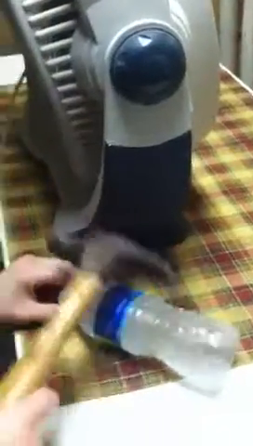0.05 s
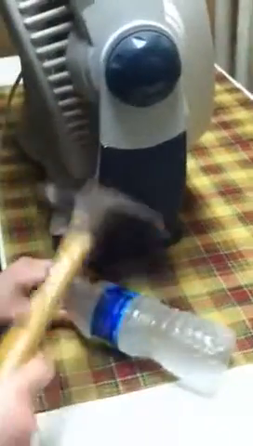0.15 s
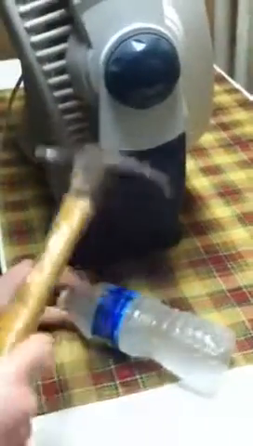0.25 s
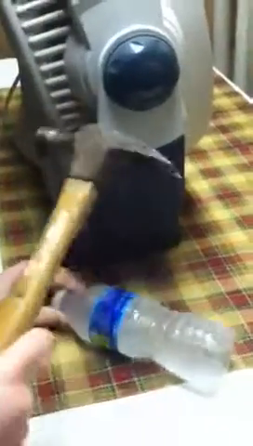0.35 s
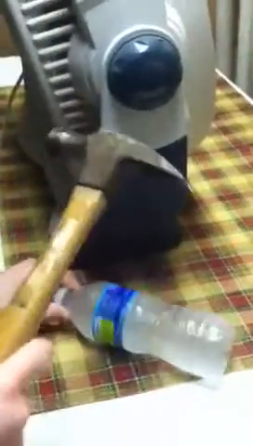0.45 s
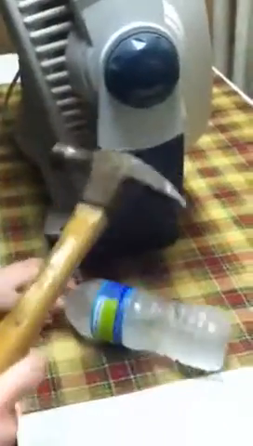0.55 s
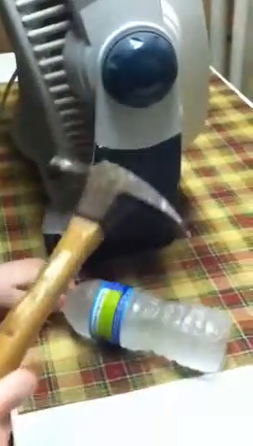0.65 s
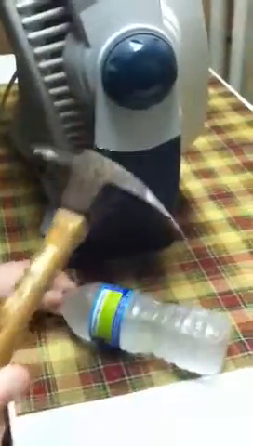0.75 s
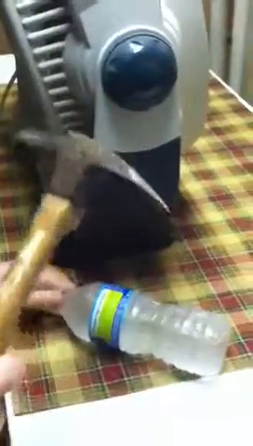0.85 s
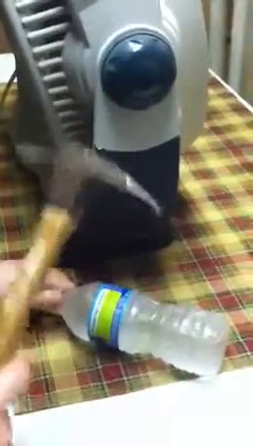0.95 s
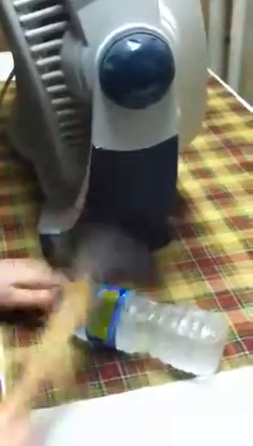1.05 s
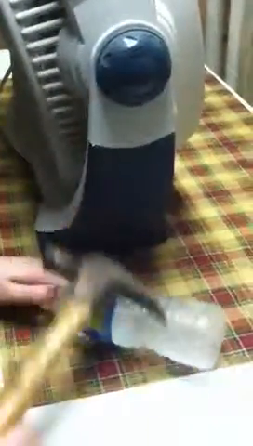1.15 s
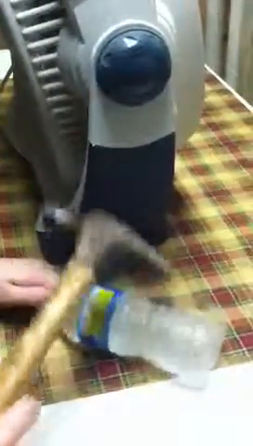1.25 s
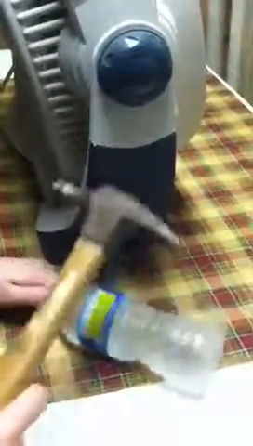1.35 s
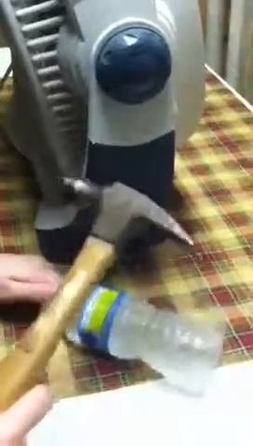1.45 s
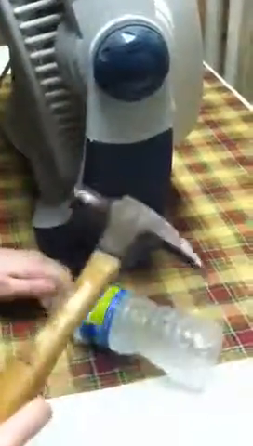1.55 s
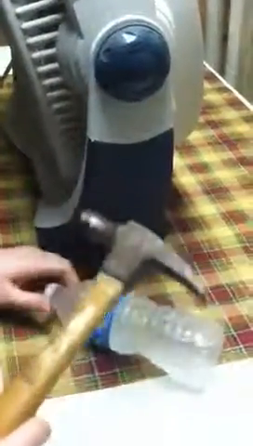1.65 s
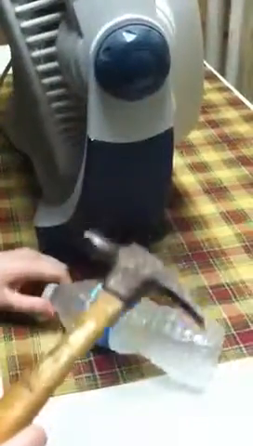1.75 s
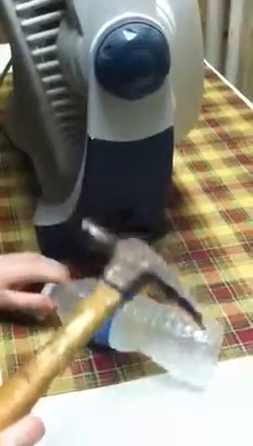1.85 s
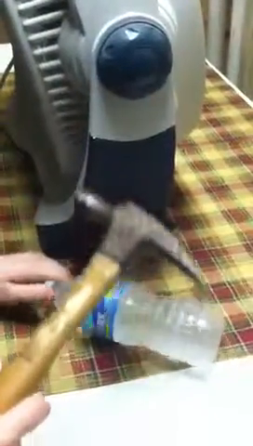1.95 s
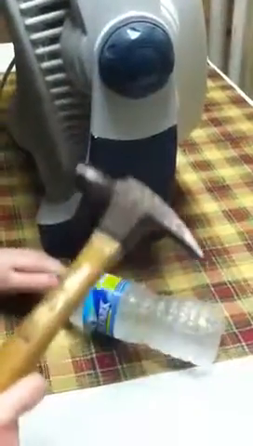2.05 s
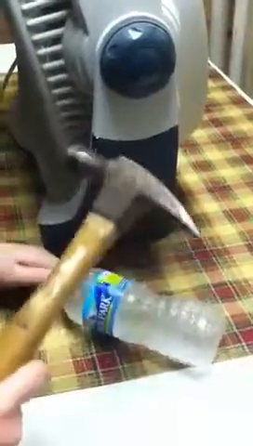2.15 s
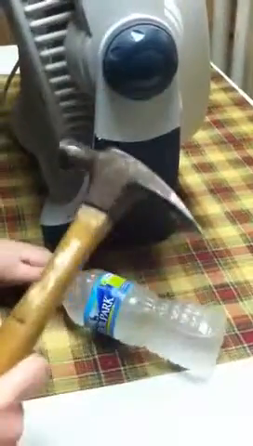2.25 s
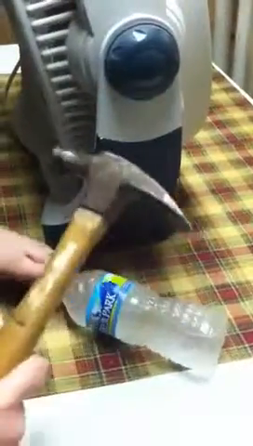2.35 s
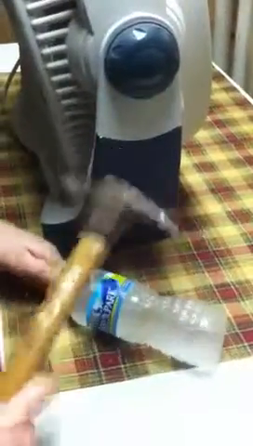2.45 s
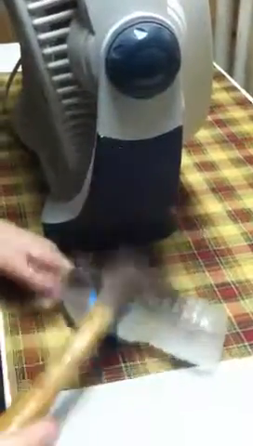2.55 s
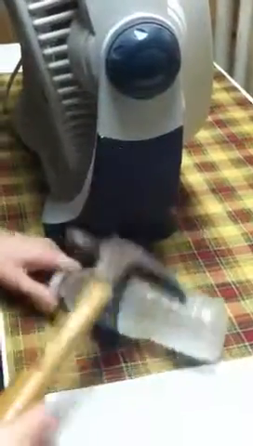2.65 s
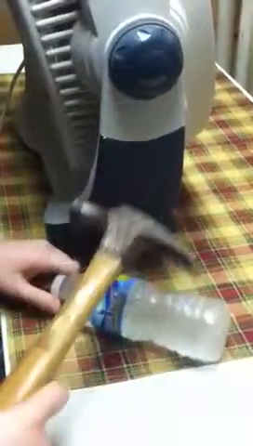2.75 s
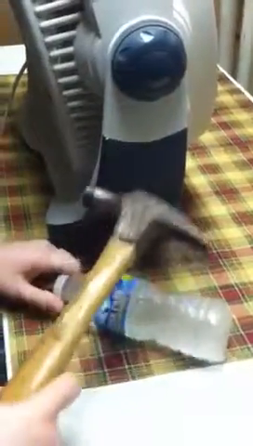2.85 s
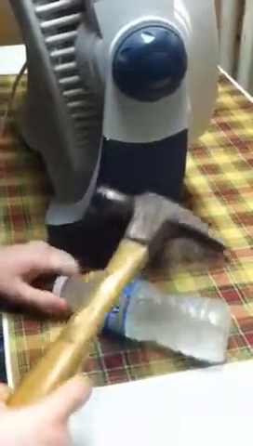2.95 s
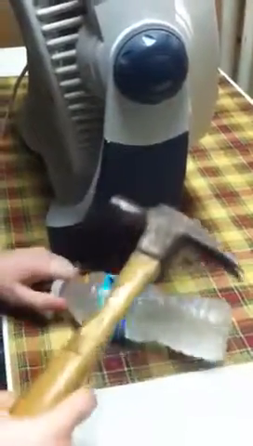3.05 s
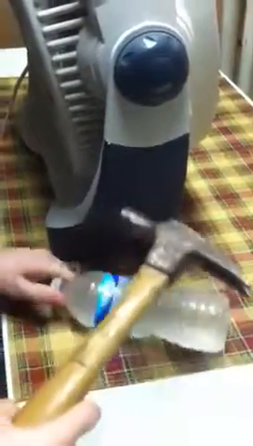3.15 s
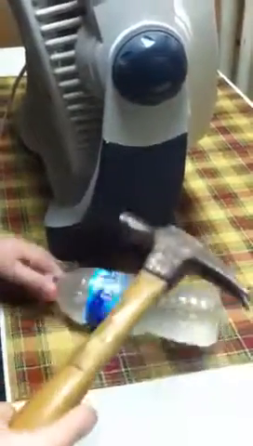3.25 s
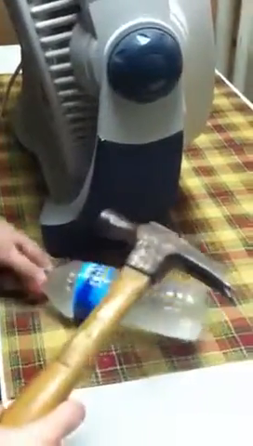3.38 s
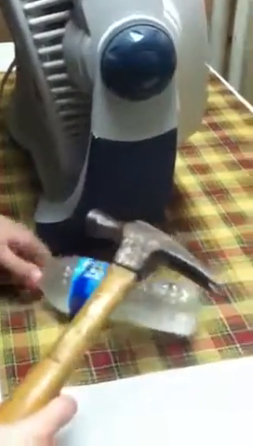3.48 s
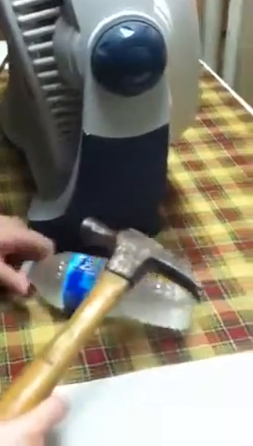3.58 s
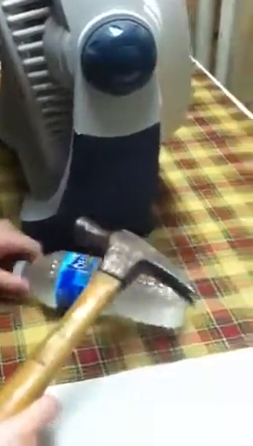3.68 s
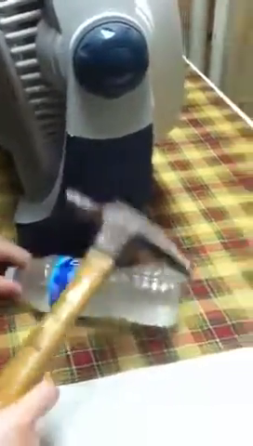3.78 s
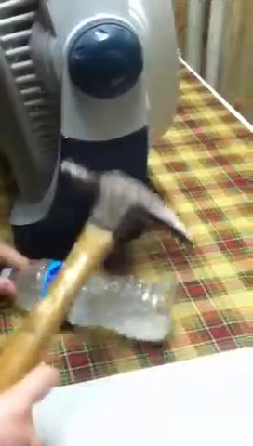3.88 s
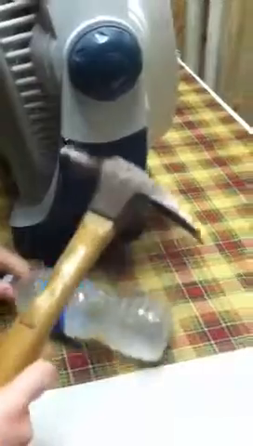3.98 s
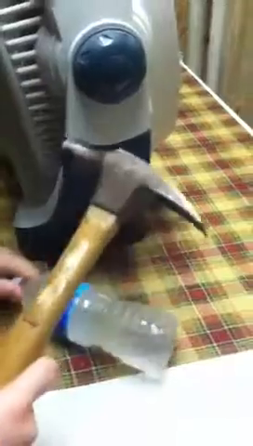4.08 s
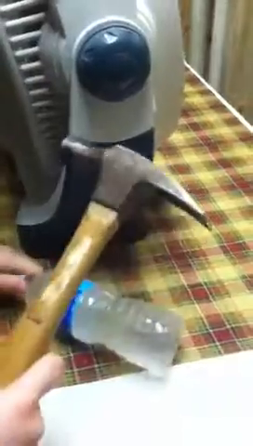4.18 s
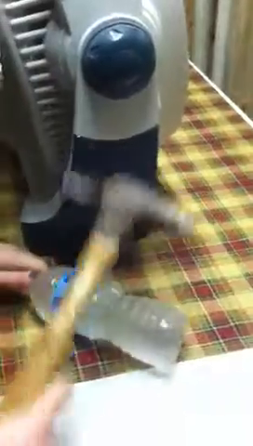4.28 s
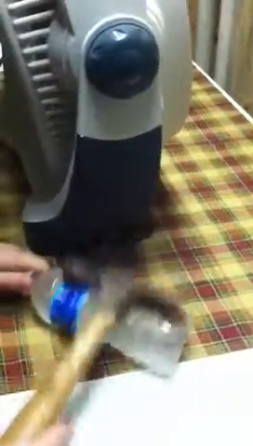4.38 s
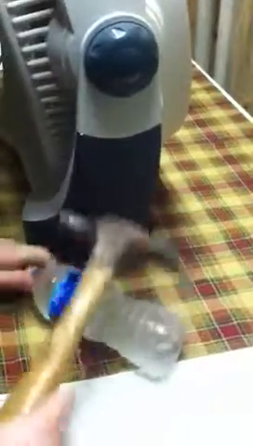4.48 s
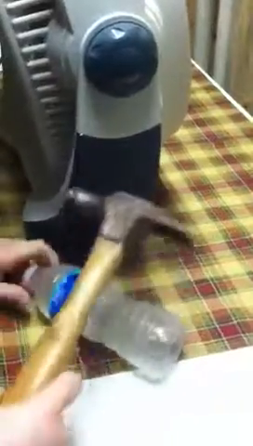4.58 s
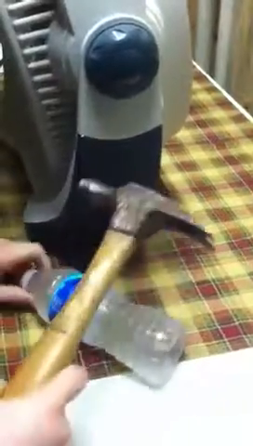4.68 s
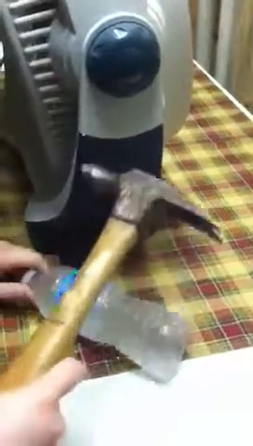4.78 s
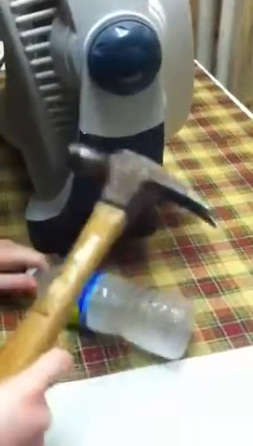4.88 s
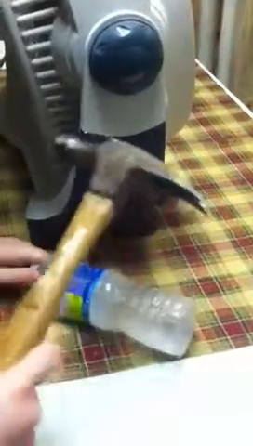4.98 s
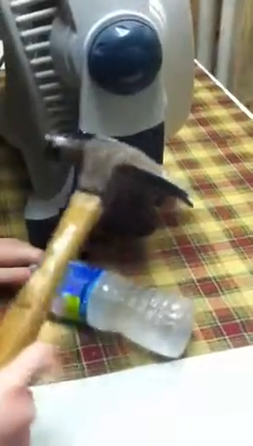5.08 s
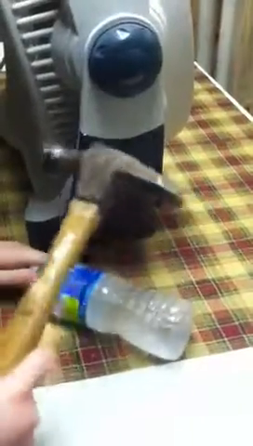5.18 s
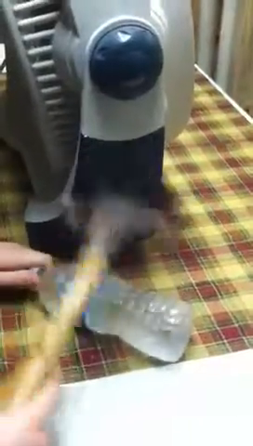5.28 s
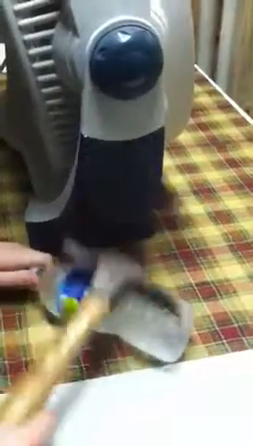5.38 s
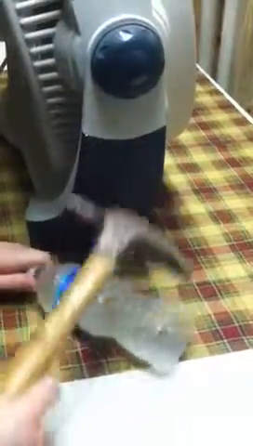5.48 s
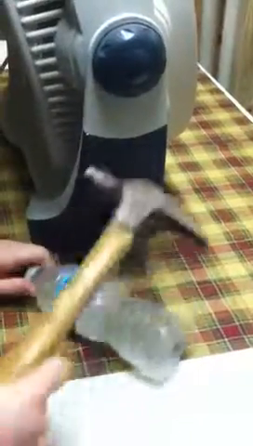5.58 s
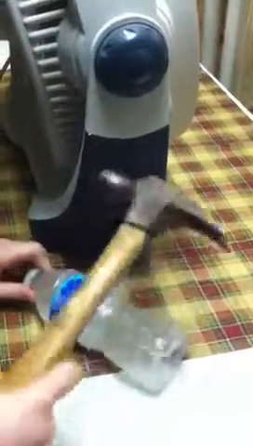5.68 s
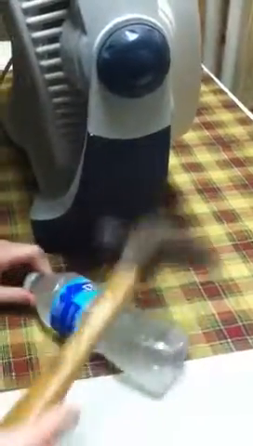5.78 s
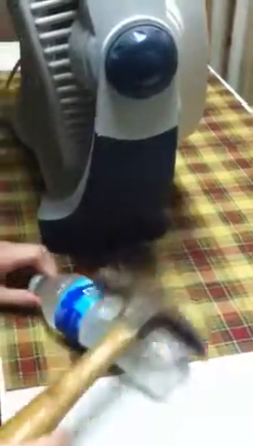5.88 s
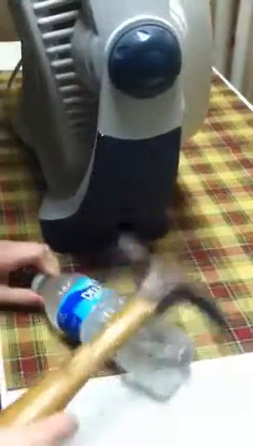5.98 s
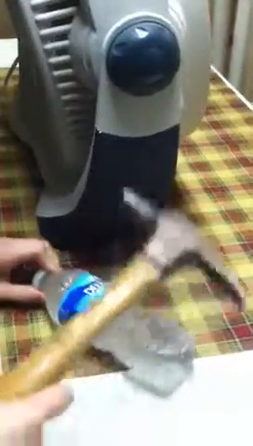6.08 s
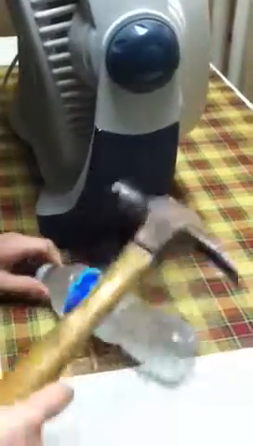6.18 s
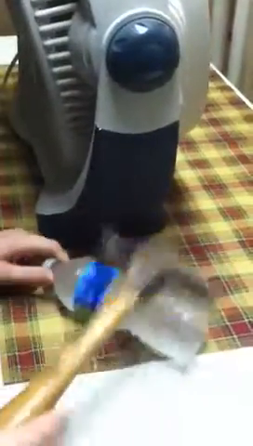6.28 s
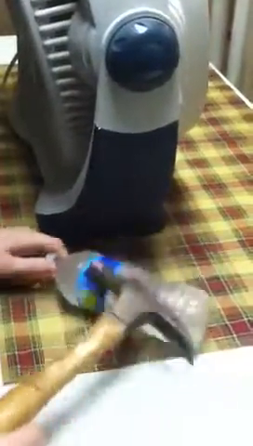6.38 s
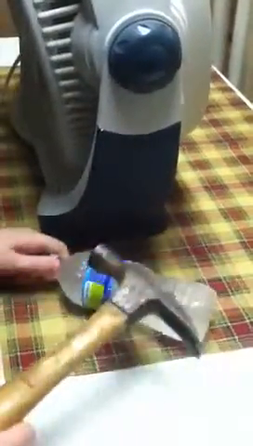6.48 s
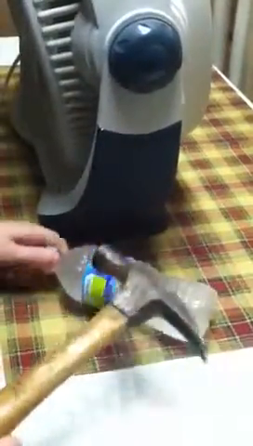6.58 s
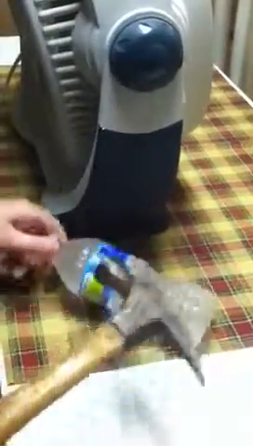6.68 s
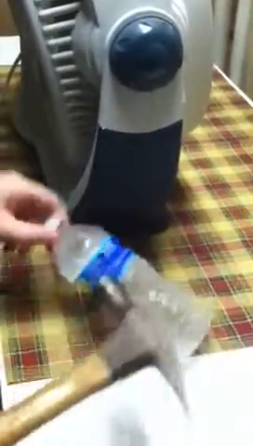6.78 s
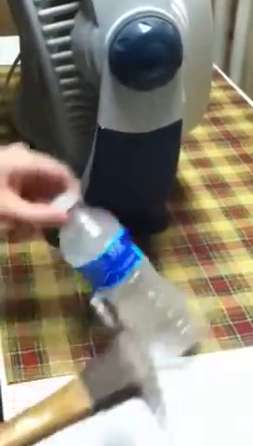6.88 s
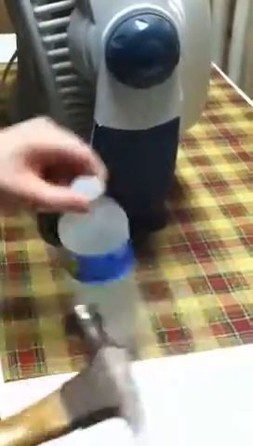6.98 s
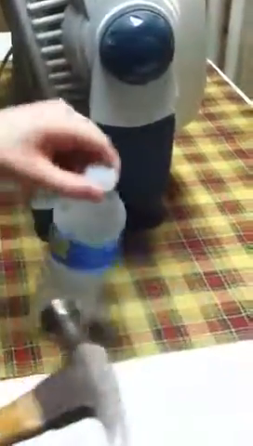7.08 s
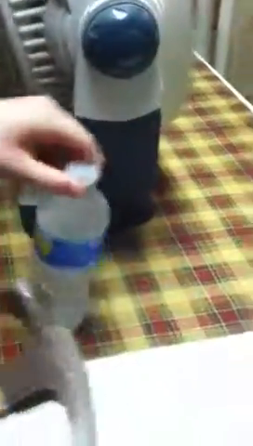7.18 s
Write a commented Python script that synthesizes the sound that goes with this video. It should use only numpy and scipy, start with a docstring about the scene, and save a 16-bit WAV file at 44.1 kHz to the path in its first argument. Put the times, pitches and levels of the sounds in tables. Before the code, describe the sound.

Seven spaced hammer blows on a frozen plastic bottle, sharp icy cracks and crunches with hollow table thumps, rustling between, in a small room.

```python
"""A hammer strikes a frozen plastic water bottle on a cloth-covered table in a small room, seven times.
Each blow breaks the ice twice, as ringing snaps amid the crunch of filtered random clicks; the bottle's
hops thump as decaying tones, boom the table and shake the loose ice. A hand turns the bottle in short
strokes: swells of filtered clicks rustle, chips ring and light contacts tick. A thin squeak creeps up
once, over steady room noise and a faint, wavering electrical hum."""
import sys
import numpy as np
from scipy import signal
from scipy.fft import rfft, irfft
from scipy.io import wavfile

SR = 44100
rng = np.random.default_rng(int(sys.argv[2]) if len(sys.argv) > 2 else 0)


def inscribe(sig):
    """Save sig as 16-bit PCM at rate SR to the path in sys.argv[1].

    A 1-D sig is mono; a 2-D sig holds one channel per row.
    Samples are clipped to [-1, 1] before scaling.
    """
    pcm = np.round(np.clip(np.atleast_2d(sig).T, -1, 1) * 32767)
    wavfile.write(sys.argv[1], SR, pcm.astype(np.int16))


N = 318843
T = np.arange(N) / SR
AGE = T[:int(.6 * SR)]  # time since a hit [s]
TOP_HZ = 15800  # upper limit of the sound

# Hammer blows: (first fracture [s], relative crunch level [dB], crunch length [s],
# treble tilt [dB per octave], ring of the ice block [Hz], ring level [dB],
# relative first fracture level [dB], wait for the second fracture [s], its relative level [dB])
BLOWS = [(0.0050, -17, 0.0091, 2, 2430, -37.5, -11.5, 0.017, -13.5),
         (1.2450, -19.5, 0.019, 1.4, 740, -33, -4.5, 0.013, -14.5),
         (2.7127, -25, 0.043, 1, 2460, -36.5, -8.5, 0.035, -17.5),
         (4.5306, -25, 0.043, 1.2, 2930, -36.5, -17.5, 0.044, -14.5),
         (5.5002, -19, 0.025, 1.5, 3270, -37.5, -11.5, .028, -20),
         (6.0071, -30.5, 0.048, 1.1, 1454, -27, -11.5, 0.013, -12),
         (6.4817, -22.5, 0.029, 3.5, 3020, -42.5, -14.5, 0.046, -14)]
# Spectrum of crunching ice and plastic: (frequency [Hz], relative density [dB])
CRUNCH_SPECTRUM = [(88, -39.5), (150, 2), (328, -4), (457, 0.5), (524, -5.5), (837, -1.5), (1170, -7),
                   (3040, -1.5), (3620, -3.5), (4760, -11), (8070, -10.5), (11300, -19), (14800, -35),
                   (16000, -45.5)]
# Spectrum of rubbing cloth and rattling ice: (frequency [Hz], relative density [dB])
RUSTLE_SPECTRUM = [(180, -36), (300, -8), (467, -4.5), (550, -4.5), (975, -6), (1210, -5), (3220, -4.5),
                   (4690, -16), (6950, -13), (10500, -26), (15000, -39)]
# Spectrum of the bottle's plastic shell: (frequency [Hz], relative density [dB])
SHELL_SPECTRUM = [(100, -30), (300, -16.5), (480, -1.5), (700, -1), (920, -1.5), (1200, -12), (1600, -4.5),
                  (2300, -2.5), (3000, 0), (3600, 2.5), (4700, -9), (7800, -9.5), (11000, -16.5),
                  (15000, -36.5)]


def undb(db):
    """Decibels to gain."""
    return 10 ** (np.asarray(db) / 20)


def unit(x):
    """Scale to rms 1."""
    return x / np.sqrt(np.mean(x ** 2))


def fade(t60):
    """Exponential decay after a hit, 60 dB down at t60 seconds."""
    return np.exp(-np.log(1000) * AGE / max(t60, 1 / SR))


def add(track, s, sound):
    """Mix a sound into a track at time s."""
    i = max(int(s * SR), 0)
    track[i:i + len(sound)] += sound[:N - i]


def convolve(x, response):
    """Pass a track through an impulse response."""
    return signal.fftconvolve(x, response)[:N]


def colour(x, spectrum, tilt_db=0, size=4096):
    """Causal filter of unit power that follows (Hz, dB) points, tilted per octave."""
    hz, db = np.transpose(spectrum)
    octave = np.log2(np.maximum(np.fft.rfftfreq(size, 1 / SR), 1))
    level_db = np.interp(octave, np.log2(hz), db) + tilt_db * octave
    # folding the cepstrum onto positive times makes the filter minimum phase
    cepstrum = irfft(np.log(undb(level_db)))
    response = irfft(np.exp(rfft(2 * cepstrum[:size // 2], size)))
    return signal.fftconvolve(x, response / np.linalg.norm(response))[:len(x)]


def soften(x, hz):
    """A softer contact loses the highs above its corner."""
    return signal.sosfilt(signal.butter(2, min(hz, SR / 3), fs=SR, output="sos"), x)


def ring(modes, scatter_db):
    """Decaying modes (Hz, dB, t60); each hit lands elsewhere and weights them anew."""
    signs = rng.choice([-1, 1], len(modes))
    gains = signs * undb(scatter_db * rng.standard_normal(len(modes)))
    out = np.zeros(len(AGE))
    for gain, (hz, db, t60) in zip(gains, modes):
        out += gain * undb(db) * fade(t60) * np.sin(2 * np.pi * hz * AGE)
    return out


def burst(t60):
    """A short puff of noise."""
    return rng.standard_normal(len(AGE)) * fade(t60)


def crackle(count, rate, spread_db):
    """Random tiny clicks, rate per second on average, with sizes set by spread_db; rms 1."""
    size = undb(spread_db * np.minimum(rng.exponential(size=count), 4))
    sign = rng.choice([-1, 1], count)
    occurs = rng.random(count) < rate / SR
    return unit(size * sign * occurs)


def background():
    """Steady coloured room noise with hum and whine tones that waver slightly in pitch."""
    # Faint tones, low hum and high whine: (frequency [Hz], rms level [dB])
    hum_tones = [(193.8, -78.5), (236.9, -84), (353, -90), (468.3, -83), (527.6, -94), (2353, -84),
                 (2584, -95.5)]
    # Spectrum of the quiet room: (frequency [Hz], relative density [dB])
    quiet_spectrum = [(25, -21.5), (70, -27), (110, -11), (190, -5.5), (300, -9), (450, -12), (700, -11.5),
                      (1200, -17), (2000, -18), (2400, -15.5), (3000, -19), (5000, -23.5), (9000, -29.5),
                      (16000, -44)]
    quiet_db = -71.18  # rms level
    hum = np.zeros(N)
    for hz, db in hum_tones:
        drift_hz = 2.1 * unit(soften(rng.standard_normal(N), 11))
        phase = 2 * np.pi * np.cumsum(hz + drift_hz) / SR
        hum += undb(db) * np.sqrt(2) * np.sin(phase)
    return hum + undb(quiet_db) * unit(colour(rng.standard_normal(N), quiet_spectrum))


def squeak():
    """A thin, faint tone with an unsteady pitch that creeps upward."""
    # Path of the squeak: (time [s], mean pitch [Hz], peak level [dB])
    path = [(1.02, 1120, -81.5), (1.07, 1220, -80), (1.13, 1270, -81.5), (1.18, 1340, -78.5),
            (1.24, 1350, -78.5)]
    s, hz, db = np.transpose(path)
    wobble_hz = 20 * unit(soften(rng.standard_normal(N), 80))
    pitch = np.interp(T, s, hz) + wobble_hz
    level = np.interp(T, s, undb(db), left=0, right=0)
    return level * np.sin(2 * np.pi * np.cumsum(pitch) / SR)


def swell(s, length):
    """One stroke of the hand: a smooth rise to time s and a slower smooth release."""
    release_ratio = 1.26
    return np.exp(-((T - s) / np.where(T < s, length, release_ratio * length)) ** 2)


def chips():
    """Chips of ice of many sizes knock together, each with a brief pitch of its own; rms 1."""
    low_hz, high_hz, t60 = 800, 6000, .008
    out = np.zeros(N)
    age = AGE[:SR // 50]
    chip_fade = np.exp(-np.log(1000) * age / t60)
    knocks = crackle(N, rate=90, spread_db=1.5)
    pitches = low_hz * (high_hz / low_hz) ** rng.random(N)
    for i in np.flatnonzero(knocks):
        add(out, i / SR, knocks[i] * chip_fade * np.sin(2 * np.pi * pitches[i] * age))
    return unit(out)


def rustle():
    """The bottle rubs over the cloth; its skin and label crinkle in small fits and the ice shifts inside."""
    # Strokes of the turning hand: (strongest moment [s], rise length [s], relative level [dB])
    strokes = [(0.548, 0.053, -66.5), (0.679, 0.065, -61.5), (1.52, 0.15, -64), (2.033, 0.026, -62),
               (2.13, 0.079, -68.5), (3.255, 0.042, -62), (3.36, 0.043, -63.5), (3.54, 0.17, -68.5),
               (3.91, 0.029, -61.5), (4.093, 0.18, -69), (4.34, .05, -67.5), (4.82, 0.091, -65.5),
               (4.957, 0.04, -59.5), (5.045, 0.036, -60.5), (5.76, 0.15, -66.5), (6.342, .04, -65),
               (6.426, 0.012, -63), (6.876, 0.014, -57), (6.96, 0.23, -60.5), (7.095, 0.033, -65)]
    rub_db, crinkle_db, chip_db = -5, -13, -10.5
    effort = sum(undb(db) * swell(s, length) for s, length, db in strokes)
    # the fits swing the level by at most 3 dB either way before scaling
    wander = np.tanh(unit(soften(rng.standard_normal(N), 40)))
    fits = unit(undb(3 * wander))
    rub = colour(crackle(N, rate=3300, spread_db=0), RUSTLE_SPECTRUM)
    crinkle = colour(crackle(N, rate=260, spread_db=3), SHELL_SPECTRUM, tilt_db=1.5)
    friction = fits * (undb(rub_db) * rub + undb(crinkle_db) * crinkle)
    return effort * (friction + undb(chip_db) * chips())


def ticks():
    """Light contacts click on the shell and ring it briefly without breaking the ice."""
    # Knocks and ticks while the bottle is turned: (time [s], relative level [dB], brightness corner [Hz])
    knocks = [(0.435, -57.5, 4000), (0.657, -43.5, 4500), (0.711, -41.5, 5000), (0.806, -31, 2280),
              (1.689, -25, 10000), (2.024, -47, 7970), (5.022, -41, 4000), (5.822, -44.5, 2200),
              (6.331, -47.5, 8200), (6.428, -43.5, 5120), (6.874, -41, 7040)]
    out = np.zeros(N)
    for s, db, corner_hz in knocks:
        contact = signal.unit_impulse(len(AGE)) + undb(-18.5) * burst(0.043)
        click = colour(contact, SHELL_SPECTRUM, tilt_db=.5)
        body = ring([(696.6, -25, 0.017), (3700, -10.5, 0.003)], scatter_db=4.5)
        add(out, s, undb(db + 6) * soften(click + body, corner_hz))
    return out


def contacts(count=3):
    """Yield (s, dB, Hz) of table contacts: the push of the blow, then shrinking hops, end after end."""
    # The bottle is driven into the table and hops: (push [s], relative level [dB], thump pitch [Hz],
    # relative deep boom level [dB], first hop [s], relative first landing level [dB], its pitch [Hz])
    thumps = [(0.003, -21, 422, -55, 0.11, -42, 403), (1.2500, -22, 301, -46, 0.11, -30, 358),
              (2.728, -26.5, 311, -42.5, .110, -28, 385), (4.533, -19.5, 370, -25.5, 0.097, -37.5, 397),
              (5.503, -18.5, 457, -29, .113, -34.5, 342), (6.017, -32.5, 340, -36.5, .130, -44.5, 312),
              (6.486, -26.5, 375, -43.5, 0.11, -55, 380)]
    boom_hz, boom_lag_s = 102, .016  # the whole table gives way after the thump
    # one end of the bottle lands first, the other follows with a lower thump
    end_lag_s, end_pitch_ratio, end_db = .012, .49, -2.5
    hop_ratio, hop_loss_db = 0.81, -9  # each hop is shorter and weaker than the last
    for s, db, hz, boom_db, hop, landing_db, landing_hz in thumps:
        yield s + boom_lag_s, boom_db, boom_hz
        for k in range(count + 1):
            yield s, db, hz
            yield s + end_lag_s, db + end_db, hz * end_pitch_ratio
            s += hop * hop_ratio ** k
            db = landing_db + k * hop_loss_db
            # later landings stray further in pitch
            hz = landing_hz * np.exp(0.084 * k * rng.standard_normal())


def thuds():
    """The bottle lands on the cloth with a hollow thump, sets the table booming and shakes the loose ice."""
    # Modes of the table top: (frequency [Hz], relative level [dB], 60 dB decay time [s])
    table_modes = [(96, -1, .27), (112, -5, .27), (150, -2, .3), (170, -4, .2), (194, -4, .18),
                   (280, -2, .12), (396, 0, .14), (462, 1, .14), (570, -4, .1), (643, -2, .12),
                   (692, -1, .12)]
    thump_cycles = 13  # a thump falls 60 dB in this many cycles, so deep ones last longer
    boom, rattle = np.zeros(N), np.zeros(N)
    for s, db, hz in contacts():
        cushion = 1 - np.exp(-AGE * hz)  # the cloth softens the first cycle
        thump = ring([(hz, 0, thump_cycles / hz)], scatter_db=2.5) * cushion
        board = undb(-23.5) * ring(table_modes, scatter_db=2) + undb(-2) * burst(0.023)
        add(boom, s, undb(db - 1) * (thump + soften(board, 2.4 * hz)))
        shaken_ice = fade(0.14) * crackle(len(AGE), rate=1500, spread_db=3)
        add(rattle, s, undb(db - 16.5) * shaken_ice)
    # a small table radiates little deep bass
    boom = signal.sosfilt(signal.butter(2, 80, "high", fs=SR, output="sos"), boom)
    return boom + colour(rattle, RUSTLE_SPECTRUM, tilt_db=-0.5)


def fracture(pitch_ratio):
    """A snap of a few cycles with a splintery noise edge, which rings the bottle."""
    # Modes of the bottle of ice: (frequency [Hz], relative level [dB], 60 dB decay time [s])
    bottle_modes = [(759, -2.5, 0.031), (1321, -9.5, 0.073), (2020, -6.5, 0.015), (2610, 0.5, .11),
                    (2530, -8, 0.055), (3200, -4, 0.034), (3400, -2.5, 0.072), (3640, -1, .1),
                    (3810, -2.5, 0.04), (5300, -9, 0.13), (7300, -10, 0.098), (8300, -4, 0.16)]
    # Snap of the ice: (frequency before the pitch ratio [Hz], relative level [dB], 60 dB decay time [s])
    snap_modes = [(3520, 0, 0.0026), (6500, -7, .005)]
    snap = ring([(hz * pitch_ratio, db, t60) for hz, db, t60 in snap_modes], scatter_db=3.5)
    edge = undb(-8) * colour(burst(0.02), CRUNCH_SPECTRUM, tilt_db=3.5)
    return snap + edge + undb(-28.5) * ring(bottle_modes, scatter_db=2.5)


def cracks(count=2):
    """The ice breaks as the hammer lands and again as it sinks in; smaller cracks run on from each break."""
    second_pitch_ratio = .82  # the second fracture snaps lower
    splinter_s, splinter_db = .016, -11  # smaller cracks follow within this time, at this relative level
    out = np.zeros(N)
    for start, *_, first_db, wait, second_db in BLOWS:
        breaks = (start, first_db, 1), (start + wait, second_db, second_pitch_ratio)
        for s, db, ratio in breaks:
            add(out, s, undb(db - 2.5) * fracture(ratio))
            for lag, size in rng.random((count, 2)):
                # pitched up to half an octave either way
                splinter = fracture(2 ** (size - .5))
                add(out, s + splinter_s * lag, undb(db + splinter_db) * splinter)
    return out


def blows():
    """Ice and plastic crunch while the hammer sinks in; the block rings and splinters settle."""
    lead_s = .0035  # the crunch fades in from this long before the snap
    out = np.zeros(N)
    for s, db, length, tilt_db, hz, ring_db, *_ in BLOWS:
        crush = (1 - np.exp(-AGE / 0.0031)) * np.exp(-(AGE / length) ** 2)
        settling = undb(-21.5) * fade(0.39)
        clicks = (crush + settling) * crackle(len(AGE), rate=2500, spread_db=1)
        add(out, s - lead_s, undb(db - 2.5) * colour(clicks, CRUNCH_SPECTRUM, tilt_db))
        add(out, s, undb(ring_db) * ring([(hz, 0, .05)], scatter_db=4.5))
    return out


def room(x, count=14):
    """Reverberation that builds up within milliseconds and decays at its own pace in each band."""
    # Small room: (frequency [Hz], 60 dB decay time [s], reverberation level [dB])
    reverberation = [(125, 0.28, -8), (407, 0.29, 1), (1060, .35, 0.5), (2840, 0.3, -6), (6000, 0.25, -2.5),
                     (12000, 0.24, -7)]
    hz, t60, db = np.transpose(reverberation)
    centres = np.log(np.geomspace(60, TOP_HZ, count))
    pitch = np.log(np.maximum(np.fft.rfftfreq(len(AGE), 1 / SR), 1))
    echoes = rfft(rng.standard_normal(len(AGE)))
    build_up = 1 - np.exp(-AGE / .004)
    tail = np.zeros(len(AGE))
    # each row of the identity picks one band, crossfading into its neighbours
    for centre, share in zip(centres, np.eye(count)):
        band = irfft(echoes * np.interp(pitch, centres, share), len(AGE))
        decay = fade(np.interp(centre, np.log(hz), t60)) * build_up
        level = undb(np.interp(centre, np.log(hz), db))
        tail += level * band * decay / np.linalg.norm(decay)
    return convolve(x, tail)


def scene():
    """All sources, each heard directly and by its own paths through the room, over the background."""
    sources = rustle(), ticks() + squeak(), thuds(), cracks(), blows()
    return (background() + sum(x + room(x) for x in sources))[None]


def record(dry):
    """The small microphone thins the deep bass; the top is cut."""
    thin = signal.sosfilt(signal.butter(2, 55, "high", fs=SR, output="sos"), dry)
    return signal.sosfilt(signal.ellip(8, .2, 70, TOP_HZ, fs=SR, output="sos"), thin)


dry = scene()
out = record(dry)
inscribe(out)
```